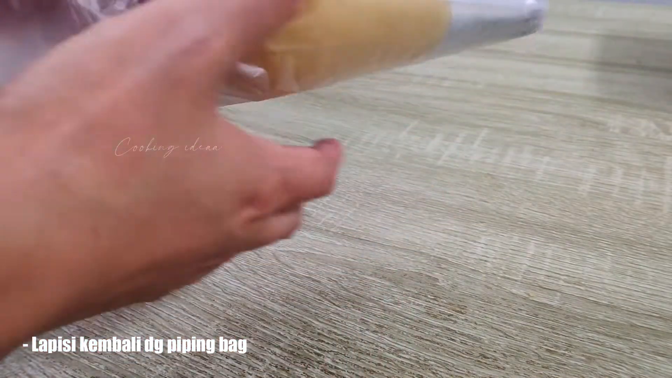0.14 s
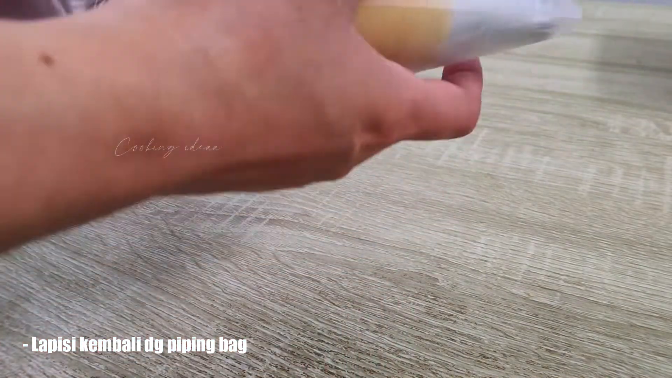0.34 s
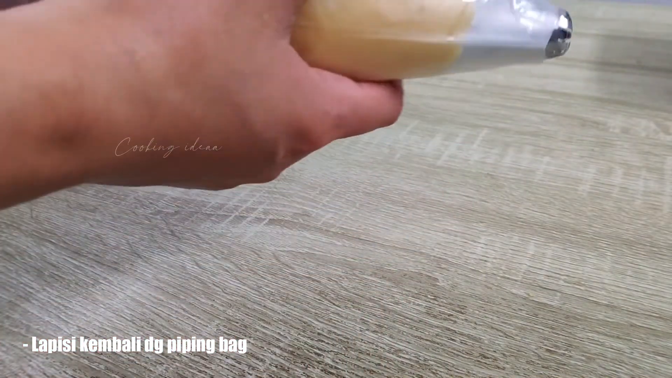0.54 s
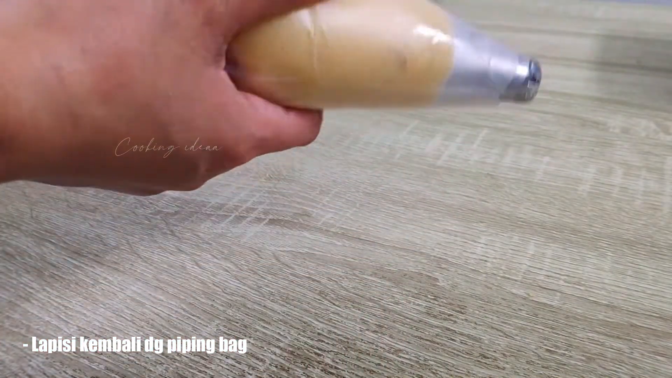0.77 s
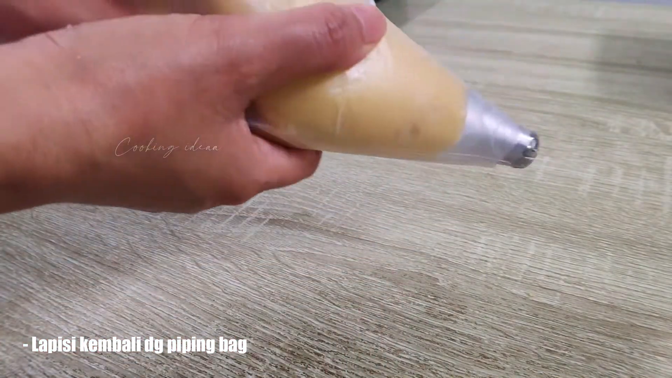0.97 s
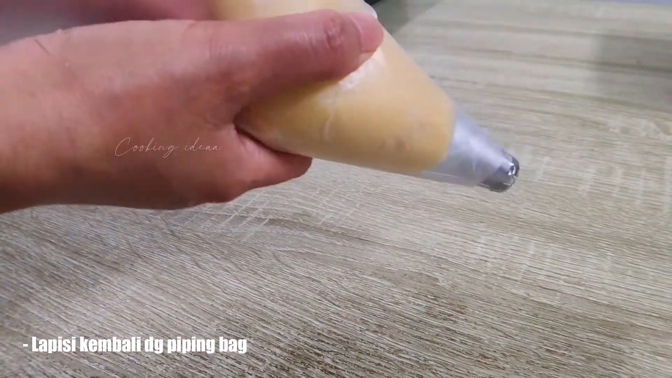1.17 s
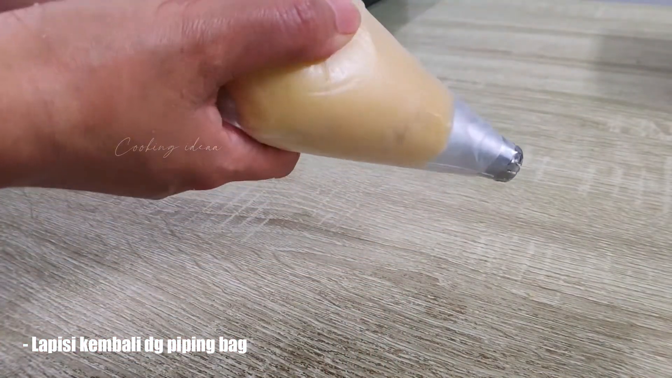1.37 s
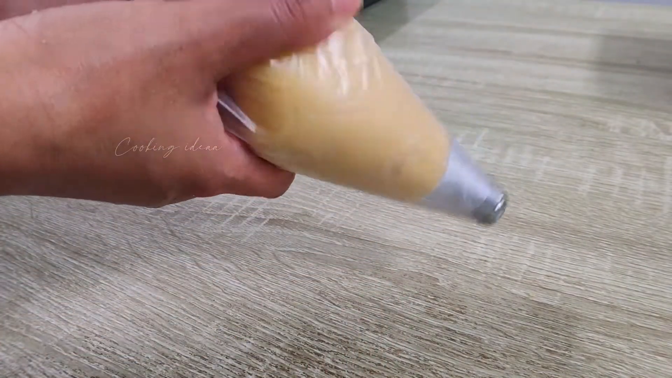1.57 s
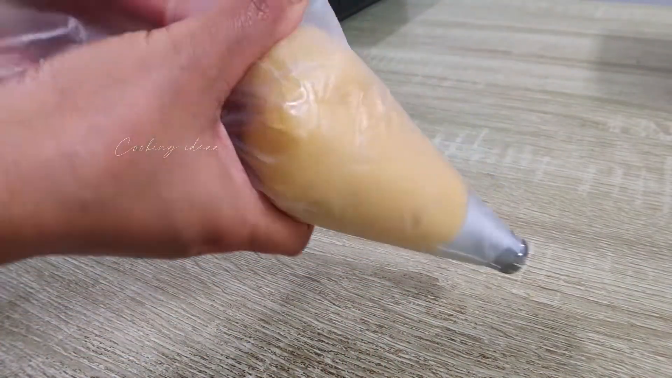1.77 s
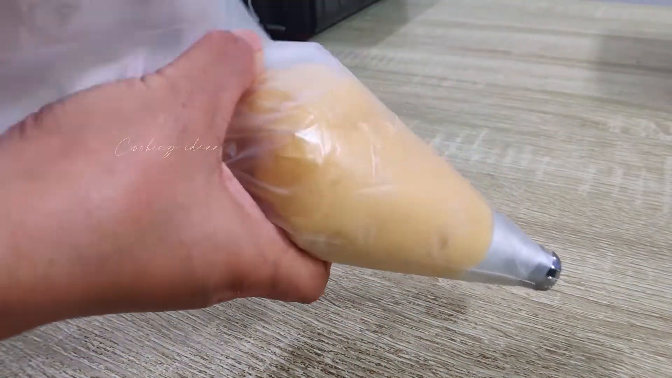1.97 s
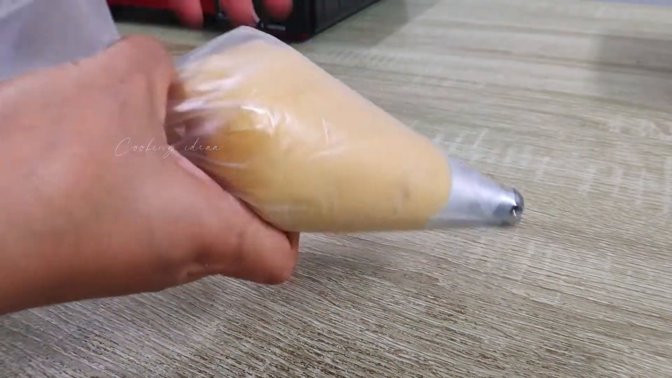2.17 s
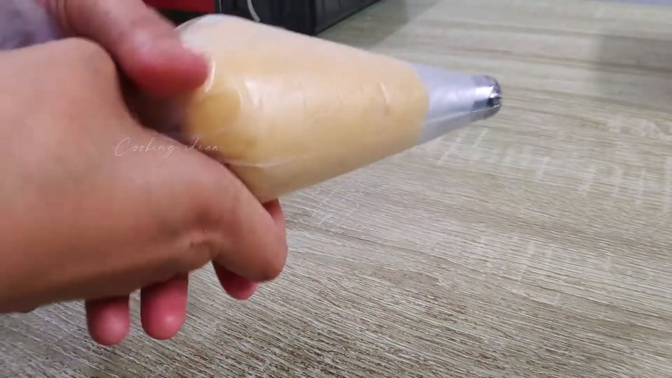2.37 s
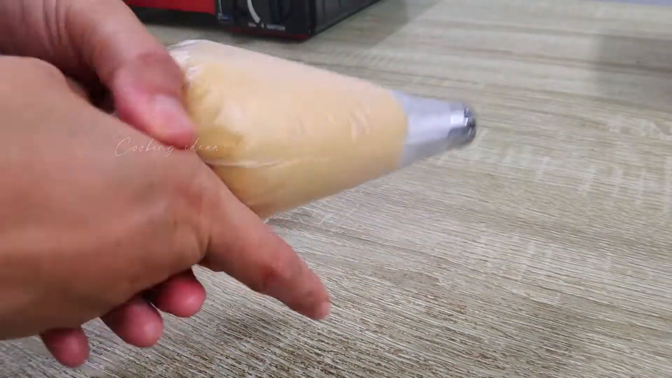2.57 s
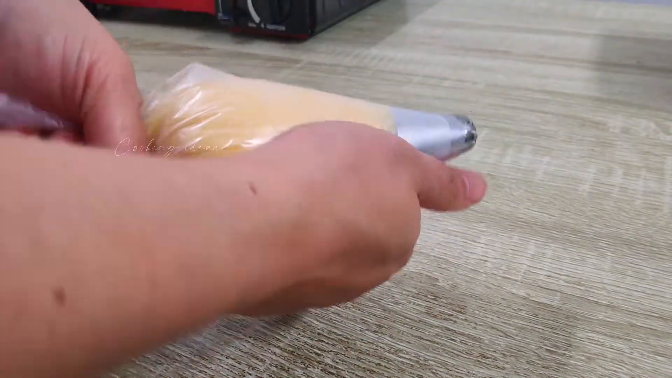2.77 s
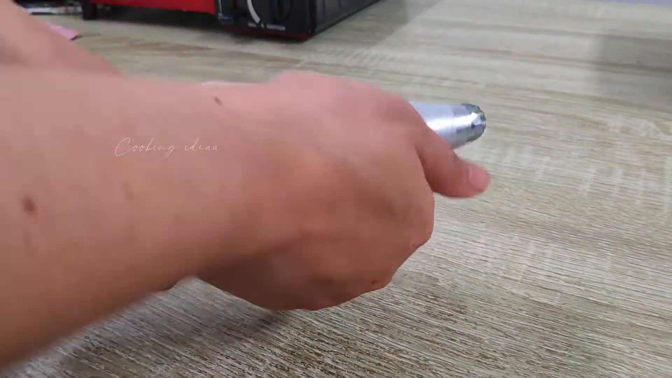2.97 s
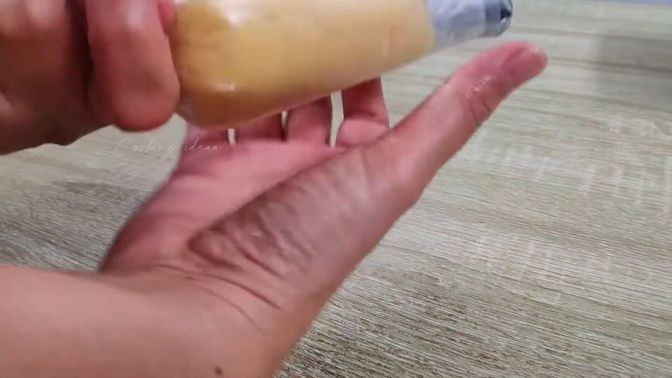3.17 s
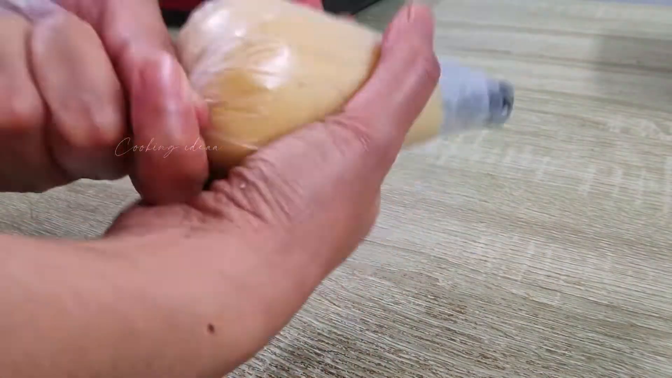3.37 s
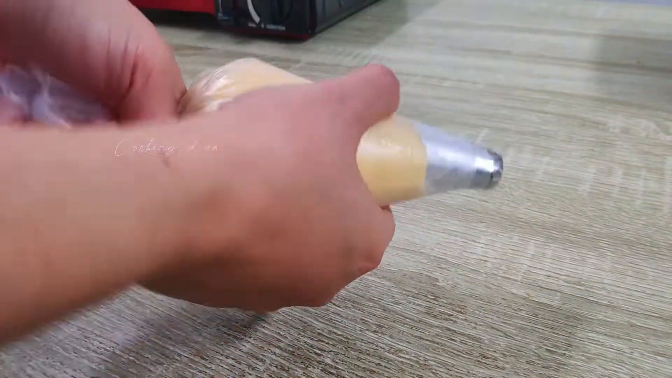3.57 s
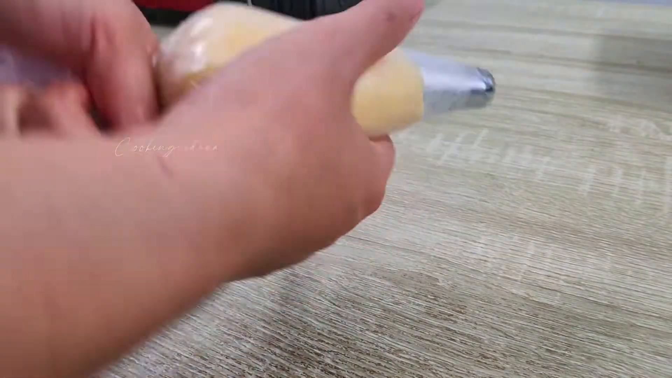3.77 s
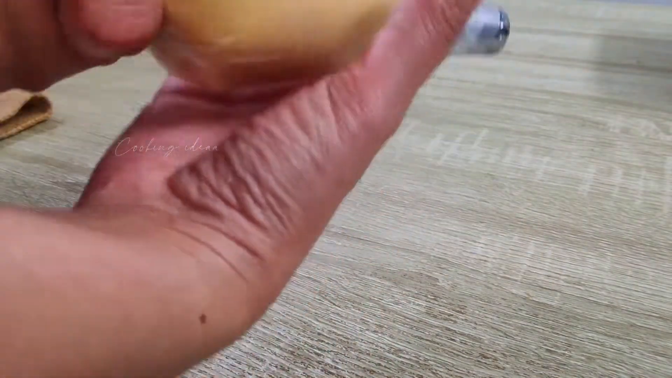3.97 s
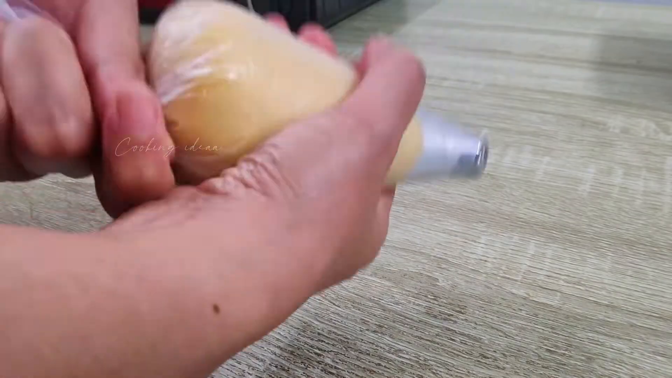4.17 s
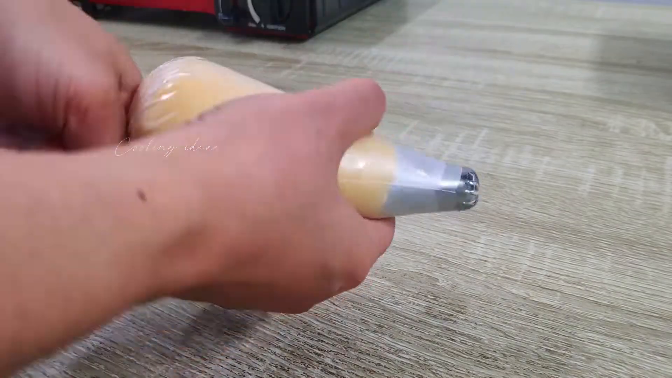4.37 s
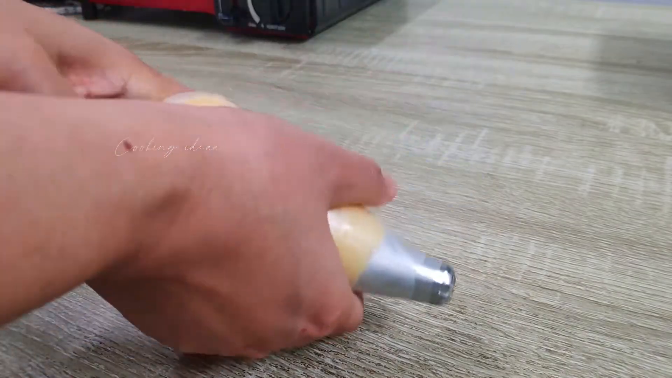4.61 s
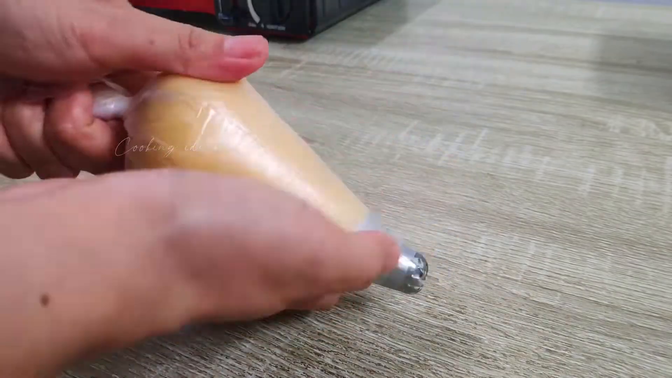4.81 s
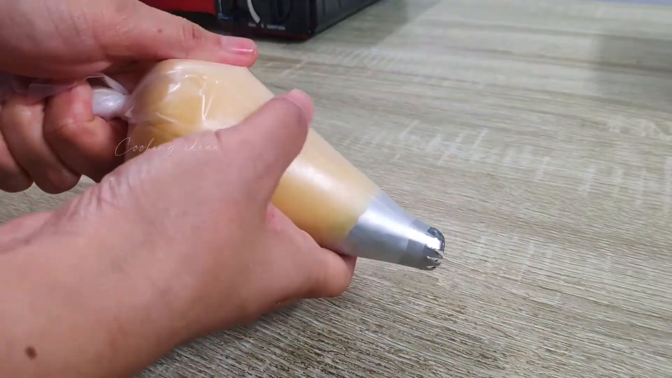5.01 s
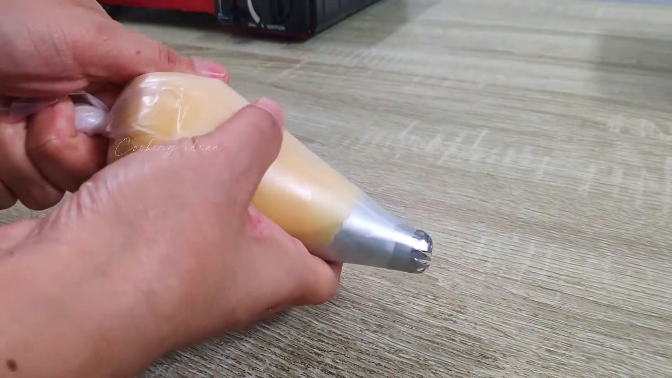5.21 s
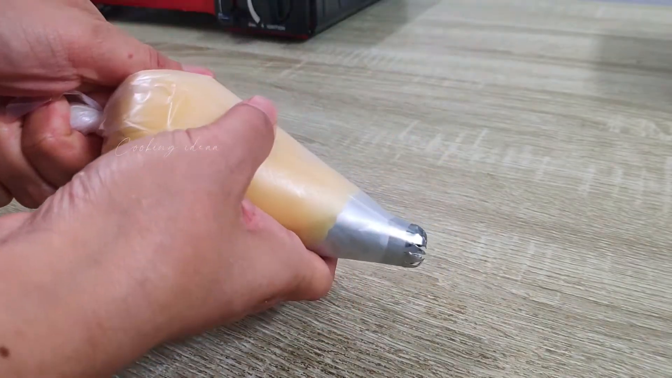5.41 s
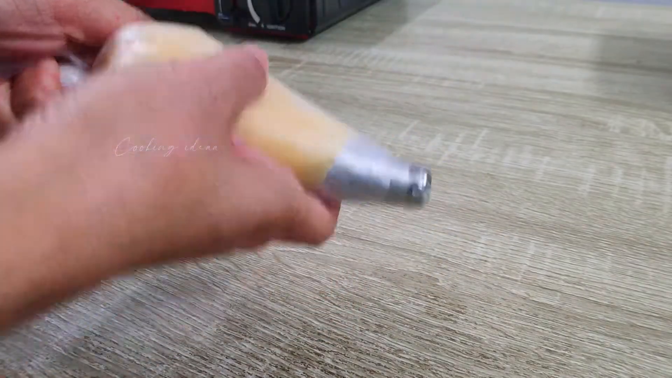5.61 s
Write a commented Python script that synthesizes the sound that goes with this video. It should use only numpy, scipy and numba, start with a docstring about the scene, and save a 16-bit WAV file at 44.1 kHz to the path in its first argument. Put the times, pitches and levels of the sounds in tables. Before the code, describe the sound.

A rush of crisp plastic crinkling opens at once, dips, then swells repeatedly, strongest around two to three seconds. The sound then thins to dry clicks in small clusters as the bag's neck is twisted, drifting slightly right. Soft muffled pats on the filling, quiet air and light room reflections; close handheld stereo pickup.

```python
"""A dense rush of crackling fades into lone snaps: hands squeeze, then twist, a filled thin plastic bag.
Each crease is a noise burst lasting milliseconds; many small random ones make the dense crackle.
A dull rub is made of longer bursts, and finger pats are short, heavily damped thuds of the soft filling.
A noise tail stands for the hard kitchen walls, over low rumble, quiet air and a faint far tone."""
import sys
import numpy as np
from scipy import signal
from scipy.fft import rfft, irfft, next_fast_len
from scipy.io import wavfile
from scipy.ndimage import uniform_filter1d
from numba import njit

SR = 44100
rng = np.random.default_rng(int(sys.argv[2]) if len(sys.argv) > 2 else 0)


def waveform_to_disk(signal):
    """Save audio, clipped to [-1, 1], as 16-bit WAV at the path in sys.argv[1]."""
    frames = np.transpose(np.atleast_2d(signal))
    scaled = np.clip(frames, -1, 1) * 32767
    samples = np.round(scaled).astype(np.int16)
    wavfile.write(sys.argv[1], SR, samples)


N = 249165
TIME = np.arange(N) / SR
TWIST_S = (1.91, 3.25)  # the hands pass from squeezing the bag to twisting its neck
LEFT_LAG_S, LAG_SPREAD_S = 2e-4, 6e-5  # how much later the left port hears the bag


def undb(db):
    """Turn decibels into a gain."""
    return 10 ** (np.asarray(db) / 20)


def gains(table, size):
    """Read a (pitch_hz, level_db) table as gains on the bins of a transform."""
    hz, db = np.transpose(table)
    bin_hz = np.arange(size // 2 + 1) * SR / size
    return undb(np.interp(np.log(bin_hz + 1), np.log(hz), db))


def colour(x, table):
    """Shape a sound with a causal filter of the given spectrum and unit energy."""
    # folding the cepstrum puts the filter's energy as early as possible
    cepstrum = irfft(np.log(gains(table, size=4096)))
    cepstrum[1:2048] *= 2
    cepstrum[2049:] = 0
    ring = irfft(np.exp(rfft(cepstrum)))[:2048]
    ring = ring / np.sqrt(np.sum(ring ** 2))
    return signal.fftconvolve(x, np.atleast_2d(ring), axes=1)[:, :N]


def pair(alike):
    """Make left and right noise: alike = 0 is unrelated, 1 is identical."""
    alike = np.clip(alike, 0, 1)
    mid, side = rng.standard_normal((2, N))
    shared = np.sqrt(1 + alike) * mid
    opposed = np.sqrt(1 - alike) * side * np.array([[1], [-1]])
    return (shared + opposed) / np.sqrt(2)


def walk(rate):
    """Drift smoothly between random levels, with about `rate` new levels a second."""
    hold = int(SR / rate)
    steps = np.repeat(rng.standard_normal(N // hold + 1), hold)
    return uniform_filter1d(steps, hold)[:N]


def squeeze_to_twist(values):
    """Glide from the squeezing value to the twisting value as the hands change their action."""
    return np.interp(TIME, TWIST_S, values)


@njit
def bursts(s, left, right, decay_s, lag_s, noise):
    """Noise bursts of unit energy that swell and die; the left port hears each a little later."""
    out, shape = np.zeros(noise.shape), np.zeros(4096)
    for g in range(len(s)):
        start, lag, span = int(s[g] * SR), int(lag_s[g] * SR), decay_s[g] * SR
        length = min(int(8 * span) + 2, out.shape[1] - 64 - start, 4096)
        energy = 1e-12
        for k in range(length):
            shape[k] = k / span * np.exp(-k / span)
            energy += shape[k] ** 2 * (noise[0, start + k] ** 2 + noise[1, start + k] ** 2) / 2
        for k in range(length):
            level = shape[k] / np.sqrt(energy)
            out[0, start + k + lag] += left[g] * level * noise[0, start + k]
            out[1, start + k] += right[g] * level * noise[1, start + k]
    return out


def creases(s, db, decay_s, noise):
    """Scatter bursts over the bag, so balance and delay between the ports differ for each."""
    lag_place, pan_place = rng.standard_normal((len(s), 2)).T
    lag = np.clip(LEFT_LAG_S + LAG_SPREAD_S * lag_place, 0, 1e-3)
    size = undb(db) * np.sqrt(5e-3 * SR)  # the level is an average over 5 ms
    pan = undb(1.2 * pan_place)
    return bursts(s, size * pan, size / pan, decay_s, lag, noise)


def swarm(db, count, scatter_db, drift_db, decay_s, alike):
    """Random creases: many small, few large, evenly scattered in time, their loudness drifting at random."""
    when, how_big, how_long = rng.random((count, 3)).T
    s = when * N / SR
    at = (s * SR).astype(int)
    spread_db = -scatter_db[at] * (np.log(1 - .98 * how_big) + 1.24)
    size_db = db[at] + spread_db + drift_db * walk(45)[at]
    length_s = decay_s * np.exp(2.4 * (how_long - .5))
    return creases(s, size_db, length_s, pair(alike))


def far_tone():
    """A faint, throbbing sine wave near 1 kHz that comes and goes, its pitch wandering slightly."""
    tone_hz, throb_hz = 942, 32  # centres of the wandering rates
    # when the far tone sounds: start_s, end_s, level_db
    tones = [(3.96, 4.09, -73), (5.26, 5.42, -74), (5.48, 5.58, -75)]
    gain = 0
    for start_s, end_s, db in tones:
        fade = np.interp(TIME, [start_s - .03, start_s, end_s, end_s + 0.015], [0, 1, 1, 0])
        gain = gain + undb(db) * fade
    throb_cycles = np.cumsum(throb_hz * (1 + .3 * walk(20))) / SR
    throb = 1 + .3 * np.sin(2 * np.pi * throb_cycles)
    tone_cycles = np.cumsum(tone_hz + 22 * walk(60)) / SR
    return gain * throb * np.sin(2 * np.pi * tone_cycles)


def room_air():
    """Steady room air: quiet noise that is mostly different at the two ports."""
    # colour of the air: pitch_hz, relative_level_db
    air_colour = [(100, -21), (300, 3), (1000, -2), (2200, -7.5), (7500, -15), (15000, -31)]
    air_db = -72.5
    return undb(air_db) * colour(pair(0.2), air_colour)


def rumble():
    """Low noise, nearly the same at both ports, that slowly rises and falls."""
    # colour of the rumble: pitch_hz, relative_level_db
    rumble_colour = [(20, 4.5), (38, 9.5), (50, -3.5), (76, 5), (107, -7.5), (135, 4), (170, -12),
                     (260, -12), (340, -39.5)]
    # loudness of the rumble over time: time_s, level_db
    rumble_level = [(0.0, -51.5), (0.19, -64), (0.52, -53), (1.21, -61), (1.87, -59), (2.02, -53),
                    (2.21, -63.5), (2.6, -56.5), (2.9, -70), (3.75, -66), (4.52, -67), (5.64, -65.5)]
    level_db = np.interp(TIME, *np.transpose(rumble_level))
    return undb(level_db) * colour(pair(0.88), rumble_colour)


def room(x):
    """Tiled walls: a decaying noise tail, unrelated at the two ports."""
    # colour of the room tail: pitch_hz, level_db
    wall_colour = [(250, -4.5), (1500, 3.5), (5000, 0.5), (8000, 0), (13000, -2)]
    t60_s, build_s, room_db = 0.53, 0.01, -11.5  # time to fade by 60 dB, build-up time, level
    t = np.arange(int(.8 * SR)) / SR
    fade = np.exp(-np.log(1000) * t / t60_s)
    tail = rng.standard_normal((2, len(t))) * fade * (1 - np.exp(-t / build_s))
    tail = tail / np.sqrt(np.sum(tail[0] ** 2))
    size = next_fast_len(N + len(t))
    spectrum = rfft(x, size) * rfft(tail, size) * gains(wall_colour, size)
    return undb(room_db) * irfft(spectrum, size)[:, :N]


def pats():
    """Each pat is a soft push on the filling: a short thud of about one heavily damped cycle."""
    # finger pats on the filling: start_s, relative_level_db, pitch_hz
    pushes = [(1.335, -23, 1080), (1.38, -32.5, 400), (1.651, -31.5, 394), (1.689, -28.5, 390),
              (1.894, -22, 514), (1.957, -32.5, 121),  (2.192, -37, 268), (2.74, -32, 595),
              (2.877, -34.5, 790), (3.211, -43, 520), (4.03, -47.5, 248), (4.469, -33, 670),
              (4.55, -32.5, 1210), (4.637, -41, 248), (4.843, -33.5, 750)]
    out, t = np.zeros((2, N)), np.arange(4000) / SR
    for s, db, hz in pushes:
        swell_and_fade = np.exp(-t * hz / 0.7) * (1 - np.exp(-t / 0.00043))
        blow = undb(db + 1.0) * np.sin(2 * np.pi * hz * t) * swell_and_fade
        for side, lag in enumerate((LEFT_LAG_S, 0)):
            start = int((s + lag) * SR)
            out[side, start:start + len(t)] += blow
    return out


def rub(crackle_db, scatter_db):
    """Rubbed film: many longer, duller bursts that follow the crackle's loudness."""
    # colour of the rub: pitch_hz, relative_level_db
    rub_colour = [(60, -5), (150, -7), (400, -3), (900, -2), (2000, -2.5), (4000, -6)]
    base_db = (-59, -66.5)  # burst level at the usual crackle level: squeezing, twisting
    usual_db, follows = -35, 0.77  # usual crackle level; dB of rub per dB of crackle
    rub_db = squeeze_to_twist(base_db) + follows * (crackle_db - usual_db)
    dull = swarm(rub_db, count=5000, scatter_db=0.52 * scatter_db, drift_db=2.5,
                 decay_s=0.0013, alike=0.7)
    return colour(dull, rub_colour)


def crackle():
    """Level of the crackle in dB: a changing base level plus crumples that swell and die away."""
    # the changing level of the crackle under the crumples: time_s, relative_level_db
    base_level = [(0.0, -27), (0.415, -58), (0.418, -38), (1.0, -33.5), (1.45, -40), (1.631, -56),
                  (1.636, -29), (1.86, -29.5), (2.34, -40), (2.5, -36), (2.9, -32.5), (3.14, -52),
                  (3.3, -43), (3.45, -49), (3.68, -37.5), (3.79, -61), (4.13, -56), (4.15, -40),
                  (4.4, -47.5), (4.7, -39.5), (4.85, -46.5), (5.0, -63), (5.3, -66.5), (5.64, -71)]
    # crumples, where the film gives way in a rush (swell and fade are times per 20 dB, at least 1 ms):
    # peak_s, relative_peak_db, swell_s, fade_s
    crumples = [(0.0, -19, .02, 0.16), (0.419, -28, .002, .08), (0.556, -29, 0.14, 0.13),
                (0.832, -26.5, 0.14, 0.11), (1.011, -31, -0.16, 0.34), (1.346, -28, 0.05, 0.22),
                (1.509, -31, -0.08, 0.1), (1.685, -22, 0.0549, 0.09), (1.876, -22, 0.05, 0.23),
                (2.09, -24.5, -0.04, 0.01), (2.191, -24, 0.03, 0.0747), (2.375, -24, 0.05, 0.1),
                (2.681, -24.5, 0.16, 0.1852), (2.747, -22, 0.18, 0), (2.886, -25.5, 0.06, 0.1855),
                (3.5, -33, 0.17, 0.22), (3.68, -38.5, 0.06, 0.1), (3.829, -41.5, 0.07, 0.23),
                (4.024, -41, 0.07, -0.26), (4.46, -39, 0.34, 0.08)]
    t = TIME[::32]
    power = undb(2 * np.interp(t, *np.transpose(base_level)))
    for s, db, swell_s, fade_s in crumples:
        slope_s = np.maximum(np.where(t < s, swell_s, fade_s), 1e-3)
        power = power + undb(2 * (db - 20 * np.abs(t - s) / slope_s))
    return np.interp(TIME, t, 10 * np.log10(power))


def film(crackle_db, scatter_db):
    """Buckling film: dense crackle plus lone snaps, whose lower part varies with the size of the fold."""
    # lone creases: start_s, level_db (over 5 ms), lower_part_db (relative to level_db),
    # length_ms (kept within 0.8-8; 3.5 times the decay constant)
    snaps = [(0.051, -24, -28, 3.8), (0.172, -29, -7.5, 1.6), (0.2133, -28, -28, 2.1),
             (0.2953, -36.5, -27, 2), (0.418, -24, -19, 2), (0.431, -29, -6, 1.2), (0.438, -25.5, -11, 1.3),
             (0.5129, -28, -28, 3.5), (0.673, -28.5, -24, 1.1), (0.7139, -27, -13, 5.4),
             (0.773, -27.5, -8, 2.2), (0.8337, -25, -13, 4), (0.876, -29, -25, 0.8),
             (1.011, -38, -19.5, 0.8), (1.1195, -31, -16, 0.66), (1.2392, -35, -20, 0.8),
             (1.3859, -24.5, -6, 5.6), (1.512, -29.5, -3.5, 8.9), (1.65, -22.5, -22, 6),
             (1.6568, -23.5, -7, 3.6), (1.689, -21, -17.5, 12), (1.7473, -23, -33, 2.2),
             (1.775, -24.5, -5, 8.4), (1.551, -34, -6, 3.3), (1.872, -25, -17, 3.5),
             (1.993, -24.5, -6.5, 9), (2.1197, -31.5, -8, 1.7), (2.1986, -22.5, -12, 7.9),
             (2.3755, -26, -29, 2.4), (2.385, -18.5, -10, 0.83), (2.397, -16.5, -32, 3.1),
             (2.5013, -28, -15, 1.1), (2.554, -26.5, -25.5, 0.76), (2.6224, -32.5, -9, 2.4),
             (2.7512, -19, -33.5, 2.6), (2.8095, -28, -20, 0.8), (2.8828, -24, -11, 1.5),
             (3.0063, -22.5, -3.5, 0.56), (3.0196, -31.5, -36, 0.69), (3.0771, -32, -1.5, 1.1),
             (3.1384, -38, 1, 0.77), (3.1587, -34.5, -35, 0.56), (3.2119, -36, -6, 3.9),
             (3.2655, -37, -25, 0.84), (3.3255, -31.5, -8.5, 9.9), (3.346, -34.5, -25, 0.64),
             (3.3709, -38, -24, 0.48), (3.3894, -38.5, 0, 0.86), (3.437, -38, -3, 1.3),
             (3.452, -36, -23, 0.87), (3.4949, -29, -22, 0.73), (3.5052, -26, -32, 0.9),
             (3.5132, -24, -34, 2.7), (3.5201, -26, -32, 1), (3.54, -27.5, -8, 1.9),
             (3.5835, -26, -27, 0.92), (3.5983, -21.5, -27, 3), (3.6111, -30, -36, 1),
             (3.6577, -24.5, -31, 0.69), (3.682, -29, -21, 0.71), (3.7229, -30.5, -3.5, 2.6),
             (3.8079, -28.5, -13.5, 1.9), (3.8155, -38, -25, 1.3), (3.833, -41, -28, 1.1),
             (3.8375, -31.5, -33, 1.4), (3.86, -38, -23, 1), (4.0863, -36.5, -18, 1.6),
             (4.1385, -34, -25, 1.2), (4.187, -34.5, 0, 0.7), (4.1969, -30, -3.5, 0.63),
             (4.2225, -33.5, -14, 0.9), (4.149, -39, -12, 0.75), (4.2505, -39, -17, 1),
             (4.263, -39, -6, 1.3), (4.2999, -30.5, -5.5, 1.7), (4.332, -27, -2.5, 1.06),
             (4.353, -28, -40, 0.91), (4.383, -31, -25, 0.72), (4.4034, -32, -24, 1.2),
             (4.4178, -19, -25, 1.4), (4.4683, -25.5, -16.5, 4.7), (4.4741, -30, -28, 0.86),
             (4.5496, -27, -25, 3.9), (4.532, -33.5, -5, 2), (4.578, -33.5, -25, 2.7),
             (4.635, -37.5, 6.5, 0.84), (4.659, -36, 2, 0.95), (4.608, -30, -18, 2.7),
             (4.6245, -36, -3, 0.96), (4.6503, -31.5, -12, 2.1), (4.692, -44, -22, 1.4),
             (4.713, -34, -4, 1.2), (4.718, -27.5, -16, 3), (4.8024, -30, -12, 1.1),
             (4.805, -33, -6.5, 0.67), (4.8116, -33, -24, 1.2), (4.8256, -49, -25, 0.71),
             (4.8392, -24, -35, 0.68), (4.851, -35, -22, 1.8), (4.918, -41.5, -17, 0.9),
             (5.052, -57, -7.5, 1.3), (5.127, -50, -30.5, 0.83), (5.1652, -53, -11.5, 1.4),
             (5.1702, -47.5, 1, 3.9), (5.201, -31, -12, 1.35), (5.209, -47, -17, 1),
             (5.332, -41.5, -2, 1.9), (5.4389, -46, -36, 0.67), (5.5135, -48, -24, 1.2)]
    # colour of a crease: pitch_hz, relative_level_db
    crease_colour = [(710, -36.5), (1200, -24), (2040, -18), (2400, -12), (3150, -12), (5240, -9.5),
                     (7570, 2), (9210, 1), (11800, -11.5), (15200, -14.5), (16000, -27.5)]
    # colour of a large fold: pitch_hz, relative_level_db
    fold_colour = [(1500, -25.5), (2800, -12.5), (3600, -5.5), (5200, 2), (6500, -12)]
    body_colour = [(2000, -9.5), (3400, -4.0), (10000, -1.5), (14000, -2)]  # pitch_hz, relative_level_db
    fold_db = squeeze_to_twist((-21, -15))  # random large folds, relative to the crackle

    top = swarm(crackle_db - 12, count=6000, scatter_db=scatter_db, drift_db=1.5,
                decay_s=0.00044, alike=0.22)
    low = swarm(crackle_db + fold_db, count=1500, scatter_db=0.66 * scatter_db, drift_db=6.5,
                decay_s=.0006, alike=0.42)
    top = colour(top, crease_colour)

    # a small lone crease radiates little below its own size
    s, db, low_db, ms = np.transpose(snaps)
    decay_s = np.clip(ms, .8, 8) / 3500
    lone_top = creases(s, db, decay_s, colour(pair(0.97), crease_colour))
    lone_low = creases(s, db + low_db, decay_s, colour(pair(0.67), fold_colour))

    taut = squeeze_to_twist([0, .8])  # taut film has little body
    bright = colour(lone_top + lone_low + taut * top, body_colour)
    return (1 - taut) * top + colour(low, fold_colour) + bright


def scene():
    """Bag and hands in the room, over rumble, room air and the far tone."""
    background = rumble() + room_air() + far_tone()
    crackle_db = crackle()
    # squeezing crumples the film evenly and rubs it; twisting lets single creases stand out
    scatter_db = squeeze_to_twist((1.5, 4.5))
    bag = rub(crackle_db, scatter_db) + pats() + film(crackle_db, scatter_db)
    pan = undb(squeeze_to_twist((-1, -6.5)) / 2)  # left minus right in dB, half to each side
    return background + room(bag) + bag * np.array([pan, 1 / pan])


def record(dry):
    """The two ports resonate at different treble pitches; the loudest peaks are rounded and the top is cut."""
    # difference between the ports: pitch_hz, left_minus_right_db
    port_balance = [(100, 0), (3000, 1.5), (5500, 1), (7300, -2.5), (8800, 11.5), (11000, 9), (15000, 7.5)]
    top_hz, ceiling = 16000, .9
    size = next_fast_len(N)
    tilt = np.sqrt(gains(port_balance, size))  # half of the difference to each side
    wet = irfft(rfft(dry, size) * np.array([tilt, 1 / tilt]), size)[:, :N]
    rounded = ceiling * np.tanh(wet / ceiling)
    top_cut = signal.ellip(12, .2, 95, top_hz, fs=SR, output="sos")
    return signal.sosfilt(top_cut, rounded)


dry = scene()
out = record(dry)
waveform_to_disk(out)
```